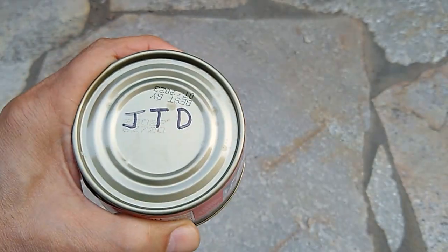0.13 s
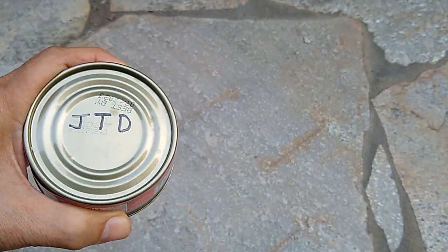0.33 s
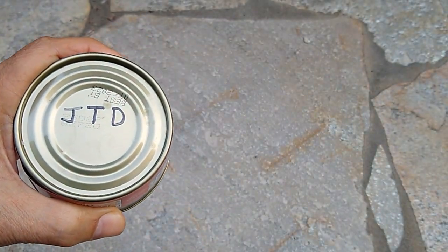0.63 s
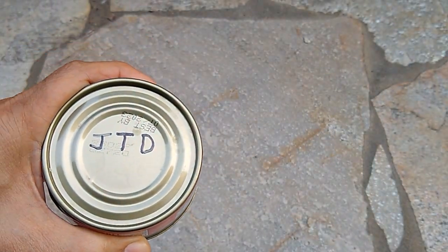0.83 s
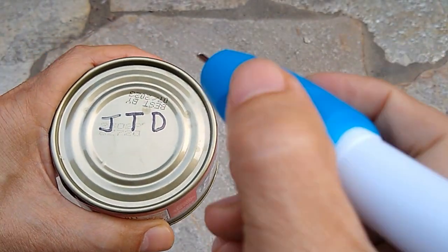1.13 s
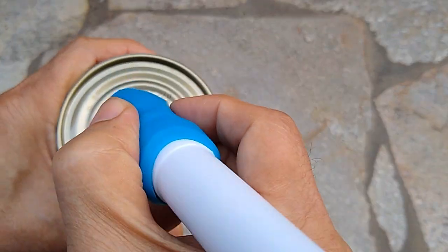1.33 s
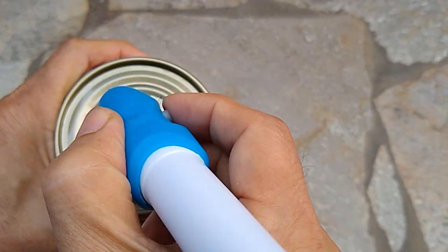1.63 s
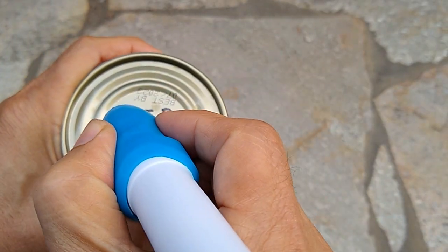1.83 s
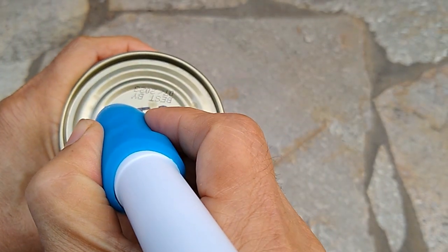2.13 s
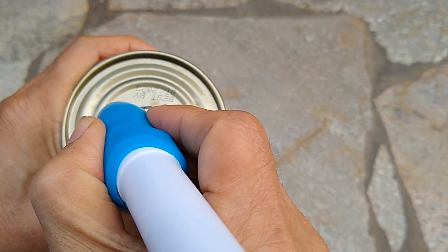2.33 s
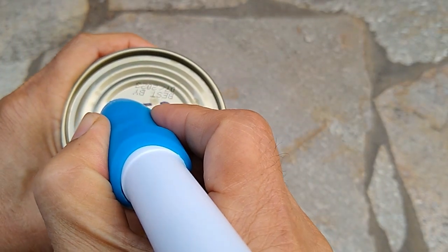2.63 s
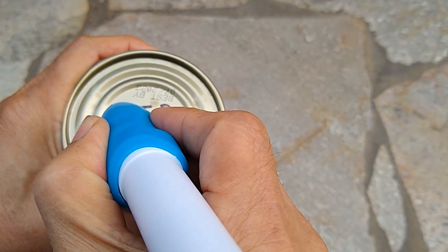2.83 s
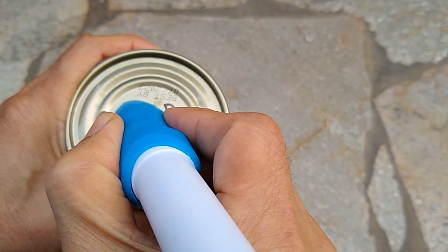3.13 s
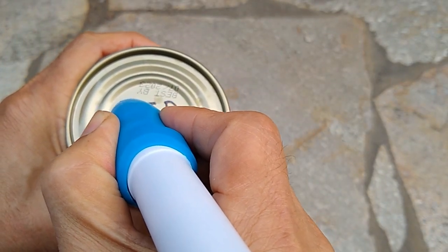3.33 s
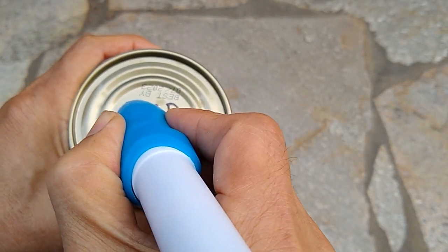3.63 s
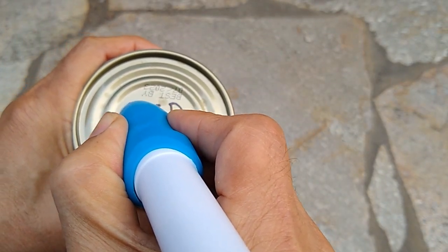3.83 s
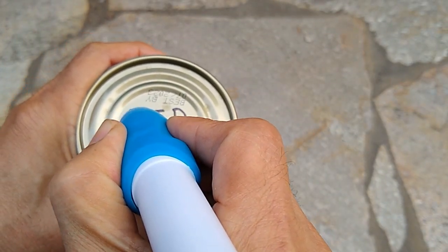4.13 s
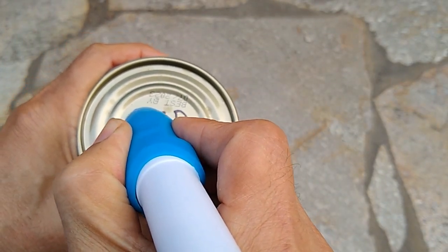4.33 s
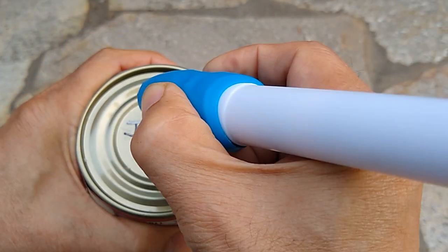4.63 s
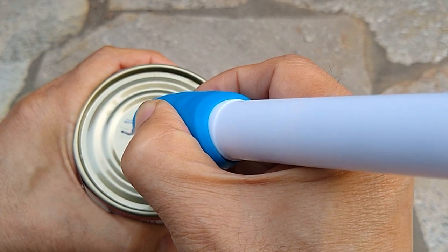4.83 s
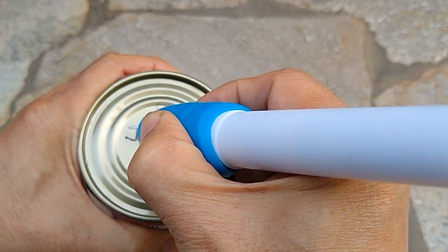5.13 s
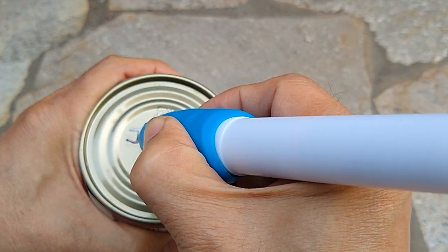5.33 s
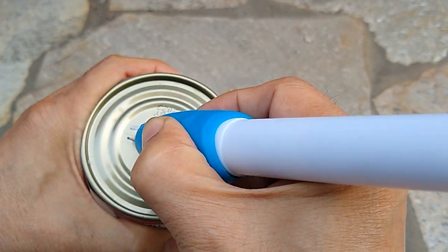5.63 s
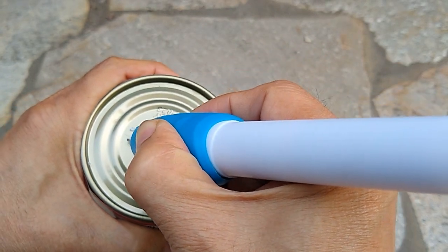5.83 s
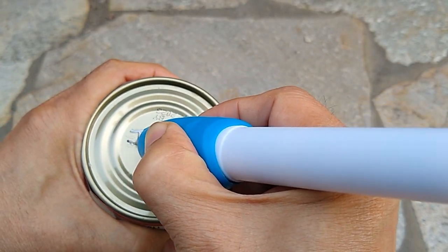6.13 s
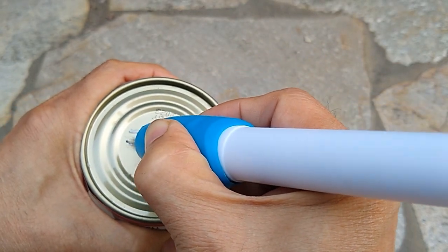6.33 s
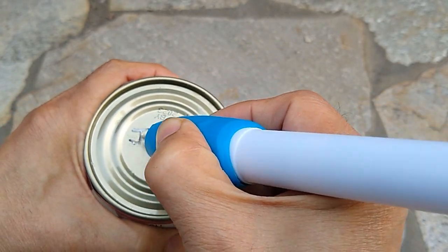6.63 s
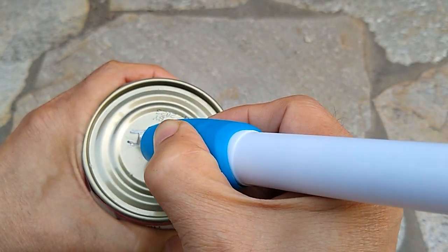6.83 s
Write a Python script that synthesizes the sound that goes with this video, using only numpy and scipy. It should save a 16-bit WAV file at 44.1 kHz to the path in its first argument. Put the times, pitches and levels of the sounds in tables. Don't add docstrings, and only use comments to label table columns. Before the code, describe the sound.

Wind crackles on a microphone, a dull knock lands, then a tiny motor tool whines and rasps metallically on a can lid, sagging in pitch, with fast ticks.

```python
import sys
import numpy as np
from scipy import signal
from scipy.fft import rfft, irfft, next_fast_len
from scipy.io import wavfile
from scipy.ndimage import uniform_filter1d

SR = 44100
rng = np.random.default_rng(int(sys.argv[2]) if len(sys.argv) > 2 else 0)


def elevation(decibels):
    levels = np.asarray(decibels, float)
    return 10 ** (levels / 20)


def unload_audio(sound):
    columns = np.transpose(np.atleast_2d(sound))
    steps = np.round(np.clip(columns, -1, 1) * 32767)
    wavfile.write(sys.argv[1], SR, steps.astype(np.int16))


N = 307818

# [t/s, breeze level/dB, hiss level/dB]
AIR = [
    (0, -74.5, -76),
    (1.23, -76, -75),
    (1.24, -77.5, -86),
    (2.4, -72, -89.5),
    (2.55, -65, -89),
    (4.55, -65.5, -92),
    (4.6, -82, -99),
    (4.82, -81.5, -95),
    (4.9, -69, -90),
    (6.98, -68, -89),
]
# [t/s, peak level/dB, 20 dB rise/s, 20 dB fall/s]
GUSTS = [(.065, -39, .058, .03), (.145, -54, .05, .028), (.245, -50, .025, .07), (.314, -44.5, .022, .07),
         (.449, -47, .2, .09), (.514, -49, .07, .015), (.778, -46, .042, .014), (.848, -55, .06, .017),
         (.93, -51.5, .025, .028), (1.152, -54.5, .06, .026), (1.2, -49, .025, .15),
         (1.272, -49.5, .03, .02), (1.347, -48.5, .05, .06), (1.507, -38.5, .165, .06),
         (1.681, -50, .3, .08), (1.74, -47, .01, .028), (1.801, -55, .04, .032), (1.84, -57, .01, .2),
         (1.956, -38, .083, .06), (2.03, -54, .1, .3), (2.21, -47, .135, .2), (2.854, -52.5, .18, .1)]
# [t/s, peak level/dB, brightness/dB]
POPS = [(0.025, -51, -16), (0.052, -41, -15), (0.117, -61, -18), (0.139, -57, -16), (0.234, -52, -9),
        (0.244, -52, -14), (0.264, -49, -12), (0.305, -55, -14), (0.318, -47, -18), (0.33, -46, -12),
        (0.351, -56, -17), (0.366, -56, -15), (0.388, -54, -15), (0.397, -56, -11), (0.414, -47, -15),
        (0.439, -52, -17), (0.452, -49, -12), (0.46, -50, -11), (0.471, -49, -23), (0.49, -59, -5),
        (0.501, -50, -13), (0.773, -43, -17), (0.84, -56, -23), (0.911, -52, -12), (0.932, -50, -21),
        (1.152, -59, -7), (1.188, -58, -11), (1.196, -51, -11), (1.229, -45, -20), (1.261, -56, -18),
        (1.301, -59, -21), (1.343, -48, -22), (1.351, -53, -16), (1.38, -54, -20), (1.38, -47, -16),
        (1.407, -45, -12), (1.465, -40, -18), (1.481, -45, -12), (1.503, -45, -9), (1.514, -45, -10),
        (1.526, -44, -11), (1.619, -50, -26), (1.64, -53, -19), (1.669, -69, -3), (1.669, -53, -19),
        (1.741, -47, -17), (1.795, -56, -29), (1.839, -57, -23), (1.883, -56, -8), (1.908, -40, -13),
        (1.921, -43, -13), (1.931, -46, -13), (1.955, -41, -12), (1.972, -46, -8), (2.0, -52, -17),
        (2.197, -49, -9), (2.209, -49, -10)]
# [t/s, f/Hz, level/dB]
CHIRPS = [
    (1.14, 3250, -72),
    (1.335, 3700, -75),
    (1.35, 2800, -71),
    (1.63, 3050, -77),
    (1.665, 2650, -73),
    (1.785, 3650, -74),
    (1.79, 2750, -77),
]
# [f/Hz, left leads right/rad]
PORT_PHASE = [(950, -3.8), (1700, -6.2), (4910, -6.4), (6720, -7.1), (8270, -9.2), (9650, -9.8),
              (10600, -11.4), (16100, -13.8)]
# [f/Hz, left over right/dB]
PORT_BALANCE = [(2500, 0), (5000, 1.6), (9000, -1.8), (12000, 0)]
# [on t/s, off t/s]
RUNS = [
    (1.495, 1.545),
    (2.015, 4.555),
    (4.82, 6.98),
]
# [t/s, knock rate/Hz]
FREE_SPEED = [(1.503, 991), (1.547, 928), (2.042, 949), (2.505, 912), (2.56, 948), (3.1, 920), (3.32, 897),
              (3.68, 915), (4.0, 920), (4.095, 975), (4.17, 897), (4.2, 890), (4.3, 820), (4.55, 820),
              (4.875, 985), (4.947, 884), (5.32, 951), (5.49, 900), (5.52, 955), (5.657, 907), (5.849, 890),
              (5.913, 950), (6.32, 982), (6.48, 890), (6.9, 915)]
# [slowest t/s, sag/Hz, slowing/s, recovery/s]
PRESSES = [(2.01, 110, .03, .035), (2.185, 22, .12, .025), (2.323, 112, .06, .06), (2.61, 30, .05, .04),
           (2.685, 298, .085, .06), (2.812, 47, .05, .05), (2.935, 161, .085, .11), (3.125, 60, .06, .09),
           (3.251, 155, .09, .055), (3.41, 180, .048, .06), (3.535, 130, .035, .06), (3.75, 55, .04, .05),
           (3.805, 100, .045, .05), (3.949, 58, .04, .035), (4.045, 60, .1, .04), (4.143, 95, .04, .035),
           (4.235, 150, .04, .045), (4.28, 180, .045, .03), (4.35, 105, .032, .055),
           (4.455, 160, .035, .06), (4.55, 130, .04, .03), (5.103, 43, .08, .035), (5.19, 160, .045, .06),
           (5.245, 140, .06, .05), (5.402, 205, .08, .085), (5.575, 25, .035, .035), (5.625, 250, .11, .03),
           (6.05, 460, .14, .1), (6.095, 250, .045, .05), (6.188, 59, .03, .04), (6.26, 30, .03, .035),
           (6.355, 45, .04, .04), (6.415, 245, .06, .09), (6.56, 62, .06, .08), (6.655, 320, .08, .04),
           (6.735, 76, .04, .07), (6.831, 57, .04, .06)]
# [t/s, roughness 0-1]
WOBBLE = [(1.5, .3), (2.0, .3), (2.04, .012), (2.27, .012), (2.32, .1), (2.38, .015), (4.8, .02),
          (4.94, .035), (4.96, .25), (5.3, .3), (5.67, .12), (5.84, .1), (6.47, .5), (6.68, .65),
          (6.8, .35), (6.95, .65)]
# [t/s, level/dB]
WHINE = [(1.495, -77), (1.509, -50.5), (1.545, -51), (1.99, -80), (2.066, -54), (2.28, -53), (2.308, -66.5),
         (2.4, -54), (2.8, -54), (3.1, -57), (3.33, -55), (4.82, -95), (4.868, -68), (4.878, -52),
         (4.976, -59), (5.1, -59), (5.78, -52), (6.975, -57)]
# [f/Hz, width/Hz, level/dB]
CASE = [(960, 316, -1.5), (1870, 740, -13), (2900, 400, -7.5), (5640, 520, -1.5), (7430, 640, 1.5),
        (9100, 1300, -1.5), (11800, 1800, 2), (14800, 1600, -0.5)]
# [t/s, drop/dB]
UNEVEN = [(1.4, 1), (2.5, 2.5), (2.52, 5), (3.3, 6), (3.36, 3), (3.55, 4), (3.6, 8), (4.2, 10), (4.6, 8),
          (4.8, 2.5), (5.33, 2.5), (5.37, 6), (5.45, 5), (5.5, 2.5), (5.6, 3), (5.66, 7), (5.93, 5),
          (5.96, 2), (6.2, 3), (6.36, 2.5), (6.4, 6)]
# [land t/s, lift t/s, level/dB, swell over stroke/dB, upper modes re level/dB]
STROKES = [(1.543, 1.558, -40, -6, 4), (2.512, 2.715, -42.5, .6, 2.5), (2.829, 3.045, -40, -2.1, 1.1),
           (3.14, 3.264, -39, -1.5, 1), (3.34, 3.44, -39.5, .6, -2.1), (3.465, 4.543, -40.3, 0.3, -1.4),
           (4.57, 4.584, -51, 0.1, 3), (5.105, 5.27, -39, 2.1, -1.5), (5.31, 5.466, -39, 1.5, .6),
           (5.493, 5.622, -39.5, 1.2, 4.5), (5.86, 6.131, -38.5, -2.6, -2.1),
           (6.195, 6.445, -40.5, 1.1, .6), (6.529, 6.655, -38.5, -3, -.6), (6.853, 6.9, -38.5, -6, 5)]
HARD_LANDINGS = [
    1.543,
    2.512,
    3.14,
    4.57,
    4.579,
    5.105,
    5.31,
    6.195,
    6.853,
]
# [t/s, roughness 0-1]
ROUGH = [(1.5, .4), (2.5, .22), (2.66, .33), (2.83, .2), (2.92, .33), (3.05, .25), (3.15, .25), (3.26, .33),
         (3.36, .13), (3.6, .16), (4.2, .18), (4.3, .24), (4.56, .33), (5.12, .28), (5.18, .07),
         (5.31, .14), (5.37, .08), (5.47, .14), (5.55, .07), (5.62, .2), (5.9, .35), (5.96, .06),
         (6.035, .12), (6.06, .45), (6.14, .4), (6.2, .15), (6.24, .06), (6.35, .05), (6.42, .12),
         (6.53, .12), (6.58, .45), (6.66, .4), (6.85, .2)]
# [t/s, hold/s, level/dB]
BITES = [(2.514, .01, 4), (3.466, .005, -7), (3.478, .02, 4), (3.648, .01, -7), (4.22, .01, 3),
         (4.25, .008, 4), (4.34, .012, 5), (4.37, .006, 4), (4.51, .03, -3), (5.11, .01, 4),
         (5.167, .045, 7), (5.232, .03, 6), (5.355, .045, 7), (5.42, .03, 6.5), (5.493, .002, -3),
         (5.55, .022, 9), (5.604, .02, 8), (5.955, .004, 9), (5.971, .004, 8), (5.99, .004, 8),
         (6.015, .02, 2), (6.06, .03, -3), (6.108, .02, 6), (5.862, .012, 4), (6.2, .03, 5),
         (6.285, .03, 3), (6.378, .02, 7.5), (6.532, .003, -6), (6.536, .014, 7), (6.615, .02, 3)]
# [t/s, middle mode level/dB]
MUTED = [(2.5, -5), (2.7, -6), (2.85, -5), (3.05, -4), (3.2, -3), (3.5, -2), (3.75, -6), (4.0, -3),
         (4.3, -5), (4.55, -4), (5.12, -2), (5.2, -10), (5.3, -4), (5.33, 2), (5.4, -8), (5.51, 3),
         (5.57, -7), (5.9, -2), (6.0, -9), (6.12, -7), (6.2, 4), (6.34, 3), (6.41, -9), (6.54, 2),
         (6.62, -8), (6.86, 0)]
# [f/Hz, width/Hz, level/dB]
LID_LOW = [(2638, 194, -0.5), (3180, 292, 1.5), (3518, 320, -0.5), (4036, 370, 2.5), (4870, 250, -8)]
# [f/Hz, width/Hz, level/dB]
LID_UPPER = [(5280, 270, -6.5), (5970, 399, -5.5), (6441, 260, -4), (6920, 200, 3), (8400, 900, -12),
             (9180, 134, -1.5)]
# [f/Hz, width/Hz, level/dB]
LID_SIZZLE = [(11000, 1900, -1), (12800, 740, -0.5), (14800, 900, -3)]
# [f/Hz, width/Hz, level/dB]
LID_RINGS = [(4640, 28, -6), (9250, 14, -8), (13500, 11, -9.5)]
# [t/s, signed size/thousandths]
JOINTS = [(1.4, 5.5), (1.467, 4.5), (1.933, 4.5), (2.333, -49), (2.533, 83), (2.933, 94), (3.667, 47),
          (3.8, 48), (3.833, -54), (4.0, -61.5), (4.167, -74), (4.2, 45), (4.633, 5.5), (4.767, -3.0),
          (5.167, 51), (5.2, -64), (5.3, -42), (5.367, -75), (5.433, 108), (5.567, -51), (5.6, -69),
          (5.767, 46), (5.933, 53), (6.0, 58), (6.1, 62.8), (6.167, 68), (6.2, 58), (6.3, -101.8),
          (6.367, -66), (6.633, -76)]

TIME = np.arange(N) / SR
SLOW = TIME[::64]
SIDES = np.array([[1], [-1]])
LIFT_S, REGRIP_S = .016, 4.7
WAVER = .004 * uniform_filter1d(np.repeat(rng.standard_normal(N // 1500 + 1), 1500), size=1500)[:N]
FLUTTER = uniform_filter1d(np.repeat(rng.standard_normal(N // 500 + 1), 500), size=500)[:N]
SLIPS = rng.standard_normal(N * 30 // SR + 1)


def unit(x):
    return x / np.sqrt(np.mean(x ** 2))


def fine(x):
    return np.interp(TIME, SLOW, x)


def curve(rows, column=1):
    columns = np.transpose(rows)
    return np.interp(TIME, columns[0], columns[column])


def gate(spans, rise_s, fall_s):
    ramps = [np.interp(TIME, [on - rise_s, on, off, off + fall_s], [0, 1, 1, 0]) for on, off in spans]
    return np.clip(sum(ramps), 0, 1)


def regrip(before, after):
    return np.where(TIME < REGRIP_S, before, after)


def walk(rate_hz):
    k = int(SR / rate_hz)
    return 1.16 * uniform_filter1d(np.repeat(rng.standard_normal(N // k + 1), k), k)[:N]


def band(x, lo_hz, hi_hz, order=2):
    sos = signal.butter(order, [lo_hz, min(hi_hz, .45 * SR)], "band", fs=SR, output="sos")
    return signal.sosfilt(sos, x)


def damp(x, edges_hz, db):
    return x - (1 - elevation(db)) * band(x, *edges_hz, order=1)


def body(x, modes, wander_db=0., tilt_db=0.):
    held = rng.standard_normal((len(modes), N * 30 // SR + 1))[:, (SLOW * 30).astype(int)]
    held = uniform_filter1d(held, size=3)
    hz, width_hz, db = np.transpose(modes)
    octaves = np.log2(np.minimum(hz, 3800)[:, None] / 3100)
    share = elevation(wander_db * held + tilt_db * octaves)
    power = np.sum(elevation(2 * db) * np.pi * width_hz / SR)
    share = share / np.sqrt(np.mean(share ** 2, axis=0) * power)
    out = np.zeros(N)
    for k in range(len(modes)):
        mode = signal.lfilter(*signal.iirpeak(hz[k], hz[k] / width_hz[k], fs=SR), x)
        out += (-1) ** k * elevation(db[k]) * fine(share[k]) * mode
    return out


def hiss():
    mid, side = rng.standard_normal((2, N))
    rumble = elevation(-5) * unit(band(rng.standard_normal(N), 60, 260))
    return elevation(curve(AIR, 2)) * (mid + rumble + .35 * side * SIDES)


def breeze():
    level = elevation(curve(AIR) + 3.3 * walk(25))
    air = rng.standard_normal((2, N))
    apart = level * unit(band(air[0], 200, 800))
    alike = elevation(-11) * level * unit(band(air[1], 200, 1200))
    return alike + apart * SIDES


def gusts():
    strength_db = np.minimum(3.7 * rng.exponential(size=N), 11)
    eddies = (rng.random(N) < 520 / SR) * elevation(strength_db) * rng.choice([-1, 1], (2, N))
    slopes = [db - 20 * np.maximum((s - SLOW) / rise_s, (SLOW - s) / fall_s) for s, db, rise_s, fall_s in GUSTS]
    calm_db = -72
    gust_db = fine(np.maximum(np.max(slopes, axis=0), calm_db))
    gust = elevation(gust_db - 5.2) * (TIME < 3.2)
    apart = unit(band(eddies[0], 250, 750, order=3))
    apart = apart + elevation(-17) * unit(band(eddies[0], 880, 1900, order=4))
    alike = unit(band(eddies[1], 300, 1014, order=3))
    alike = alike + elevation(-4.5) * unit(band(eddies[1], 1014, 2400, order=3))
    return gust * (elevation(-11) * alike + apart * SIDES)


def pops():
    dull, bright = np.zeros((2, N))
    for s, db, bright_db in POPS:
        at = int(s * SR) + 60
        dull[at] = elevation(db + 29.5)
        bright[at] = elevation(db + bright_db + 11.5)
    apart = elevation(12) * band(dull * rng.choice([-1, 1], N), 305, 740, order=3)
    alike = band(dull, 297, 990, order=3) + elevation(5) * band(bright, 950, 2900, order=3)
    return alike + apart * SIDES


def birds():
    chirp_s, fall = .035, .08
    out = np.zeros(N)
    t = np.arange(int(chirp_s * SR)) / SR
    swell = np.sin(np.pi * t / chirp_s)
    for s, hz, db in CHIRPS:
        whistle = np.sin(2 * np.pi * hz * t * (1 - fall * t / chirp_s / 2))
        out[int(s * SR):][:len(t)] += elevation(db) * swell * whistle
    return out * 1.1 * walk(180)


def thump():
    start_s, level_db, boom_hz, t60_s = 1.069, -33.5, 58, .1
    t = np.clip(TIME - start_s, 0, None)
    glide_s = .01 * (1 - np.exp(-t / .012)) - .003
    boom = np.sin(2 * np.pi * boom_hz * (t + glide_s)) * np.exp(-np.log(1000) * t / t60_s)
    boom = 1.93 * boom * (1 - np.exp(-t / .0045))
    crack = elevation(3.8) * np.exp(-t / .0014) * band(rng.standard_normal(N), 300, 2100)
    return elevation(level_db) * (boom + crack) * (t > 0)


def sag():
    lost_hz = np.zeros(len(SLOW))
    for s, hz, down_s, up_s in PRESSES:
        press = np.interp(SLOW, [s - down_s, s, s + up_s], [0, 1, 0])
        lost_hz += hz * np.sin(np.pi / 2 * press) ** 2
    return lost_hz


def speed():
    chatter, joint_step = .012, .003
    cutting = gate([(s[0] + .02, s[1]) for s in STROKES], .02, .01)
    flutter = chatter * FLUTTER * curve(ROUGH) / .2 * cutting
    step = joint_step * SLIPS[np.arange(N) * 30 // SR]
    return (curve(FREE_SPEED) - fine(sag())) * (1 + WAVER + flutter + step)


def knocks(rough, late, scatter_db, uneven=1.):
    phase = np.cumsum(speed()) / SR
    count = np.arange(1, int(phase[-1]))
    chance = rng.standard_normal((2, len(count)))
    at = np.interp(count, phase, np.arange(N))
    near = at.astype(int)
    at = at + late * rough[near] * chance[0] * SR / 900
    weak_db = (uneven * curve(UNEVEN))[near] * (count % 2)
    size = elevation(scatter_db * rough[near] * chance[1] - weak_db)
    taps = np.floor(at)[:, None] + np.arange(-7, 9)
    offset = taps - at[:, None]
    pulse = size[:, None] * np.sinc(offset) * np.cos(np.pi * offset / 16) ** 2
    where = np.clip(taps, 0, N - 1).astype(int)
    return unit(np.bincount(where.ravel(), pulse.ravel(), N))


def hum():
    down = gate([s[:2] for s in STROKES], .005, .02)
    level = elevation(-77 - 6 * down + 3 * walk(30))
    running = gate([(on + .045, off) for on, off in RUNS[1:]], .015, .01)
    return level * np.sin(2 * np.pi * np.cumsum(speed()) / SR) * running


def whine():
    rough = curve(WOBBLE)
    steady = knocks(rough, late=.011, scatter_db=4.5, uneven=regrip(.25, 1.))
    force = np.sqrt(1 - rough) * steady + np.sqrt(rough) * rng.standard_normal(N)
    case = unit(band(body(force, CASE, 1.5), 600, 15800))
    case = damp(case, (3200, 5000), regrip(-4.5, 0))
    duck_db = -12 * gate([(s[0] + .01, s[1] + LIFT_S) for s in STROKES], .008, .028)
    return case * elevation(curve(WHINE) + 3 + duck_db) * gate(RUNS, .007, .0054)


def strokes():
    land_s, lift_db_per_s, dull_db, dull_s = .003, 1900, -5, .04
    table = np.transpose(STROKES)
    current = np.clip(np.searchsorted(table[0], TIME + .002) - 1, 0, None)
    land, lift, db, swell_db, upper_db = table[:, current]
    swell = swell_db * np.clip((TIME - land) / (lift - land), 0, 1)
    level_db = db + swell - lift_db_per_s * np.clip(TIME - lift, 0, LIFT_S)
    down = gate([(s[0] + land_s, s[1] + LIFT_S) for s in STROKES], .0012, .002)
    since_s = np.abs(TIME - land)
    return down * elevation(level_db), upper_db + dull_db * np.exp(-since_s / dull_s), since_s


def bites():
    rise_s, fall_s = .005, .014
    return sum(db * np.interp(SLOW, [s - rise_s, s, s + hold_s, s + hold_s + fall_s], [0, 1, 1, 0])
               for s, hold_s, db in BITES)


def lid():
    contact, upper_db, since_s = strokes()
    touch = contact * elevation(1.55 * walk(90) + .6 * walk(35))
    clean = 1 - .75 * np.exp(-since_s / .04)
    rough = np.clip(1.15 * curve(ROUGH) * clean + .022, 0, 1)
    scrape = unit(elevation(2.95 * walk(300)) * rng.standard_normal(N))
    blows = knocks(rough, late=.05, scatter_db=7)
    force = np.sqrt(1 - .99 * rough) * blows + np.sqrt(.55 * rough) * scrape
    force[[int(s * SR) + 150 for s in HARD_LANDINGS]] += elevation(18)

    def ring(push, db, modes, wander_db, tilt_db=0.):
        return body(push * touch * elevation(db), modes, wander_db, tilt_db) / np.std(push)

    bite, press_hz = bites(), np.minimum(sag(), 250)
    bite_db, load = fine(bite), fine(press_hz) / 100
    tilt_db = -5.5 + .3 * np.maximum(bite, 0) + regrip(2.5, 8)[::64] * press_hz / 100
    low = band(ring(force, regrip(3.2, .6) + bite_db, LID_LOW, 2.2, tilt_db), 1846, 5200, order=3)
    bite_upper_db = np.minimum(bite_db, -.3 * bite_db)
    upper = ring(force + .18 * scrape, upper_db + 5.4 + bite_upper_db, LID_UPPER, 2.9)
    upper = band(upper, 5040, 9960, order=3)
    sizzle_db = regrip(-6, -9.1) + .4 * upper_db + 4.8
    sizzle = band(ring(force + .7 * scrape, sizzle_db, LID_SIZZLE, 2.3), 9600, 15800, order=3)

    turn = 2 * np.pi * np.cumsum(speed()) / SR
    note = elevation(-24) * np.sin(turn) + elevation(regrip(-21, -15)) * np.sin(2 * turn)
    skirt = elevation(-12 + .3 * bite_db) * band(blows * touch, 1550, 2350) + touch * note
    click = unit(band(blows, 2400, 4400)) + unit(band(blows, 5300, 7500))
    click = click * elevation(-7 + np.minimum(bite_db, 0)) * touch

    tin = damp(low + upper + click, (2150, 2750), load * regrip(-2, -2.8))
    muted_db = curve(MUTED)
    tin = np.where(TIME < 3.1, damp(tin, (4800, 6400), muted_db), damp(tin, (4450, 5300), muted_db))

    last_db = 19.5 * (TIME > 6.862)
    rings = damp(ring(force, regrip(-17, -9) + last_db, LID_RINGS, 0.), (7500, 16500), -last_db)
    tip_damps = elevation(-9 * gate([s[:2] for s in STROKES], .001, .012))
    return tin + sizzle + skirt + rings * tip_damps


def ports(x):
    size = next_fast_len(N + 4096)
    hz = np.arange(size // 2 + 1) * SR / size
    turn = np.interp(hz, *np.transpose(PORT_PHASE))
    lean_db = np.interp(hz, *np.transpose(PORT_BALANCE))
    spectrum = rfft(x, size)
    return np.array([irfft(spectrum * np.exp(1j * side * turn / 2) * elevation(side * lean_db / 2), size)[:N]
                     for side in (1, -1)])


def scene():
    pen = lid() + whine()
    echo = elevation(-25) * np.roll(pen, int(.0021 * SR))
    echo = echo + elevation(-17) * np.roll(band(pen, 7500, 15800), int(.011 * SR))
    background = hiss() + breeze() + gusts() + pops() + birds() + thump()
    return background + hum() + ports(pen) + echo * SIDES


def low_pass(x):
    return signal.sosfilt(signal.butter(12, 16500, fs=SR, output="sos"), x)


def record(dry):
    s, size = np.transpose(JOINTS)
    joint = SR // 30
    joints = np.arange(joint, N, joint) - 2
    ticks = np.zeros((2, N))
    ticks[:, joints] = .024 * np.tanh(70 * dry.mean(axis=0)[joints - 40])
    uneven = 1 + .3 * rng.standard_normal(len(s)) * SIDES
    ticks[:, np.round(s * 30).astype(int) * joint - 2] = size / 1000 * uneven
    top = signal.ellip(10, .2, 40, 15700, fs=SR, output="sos")
    mix = signal.sosfiltfilt(top, .12 * np.tanh(dry / .12) + ticks)
    return low_pass(np.clip(mix, -.09, .09))


dry = scene()
out = record(dry)
unload_audio(out)
```